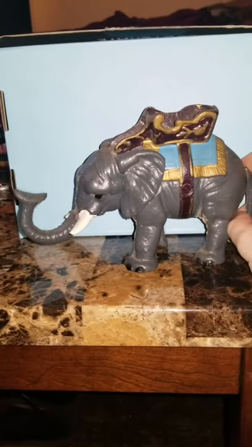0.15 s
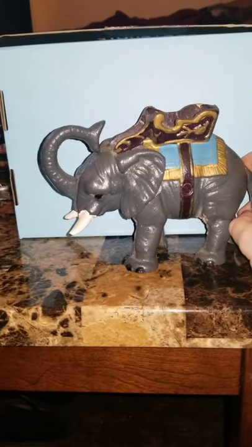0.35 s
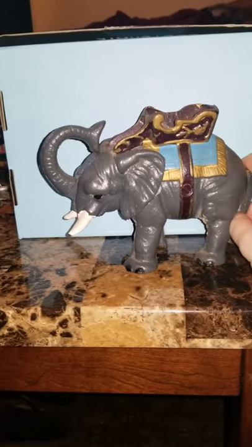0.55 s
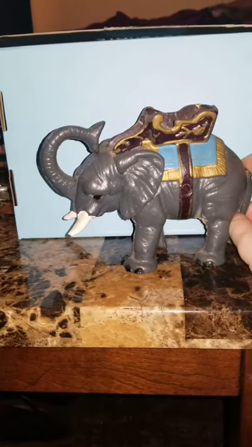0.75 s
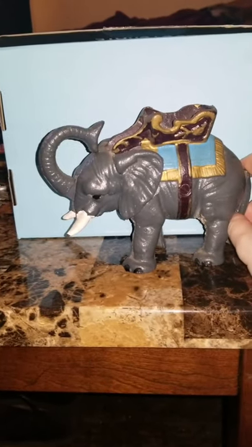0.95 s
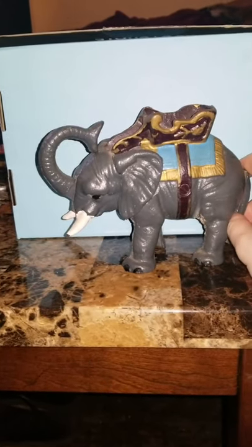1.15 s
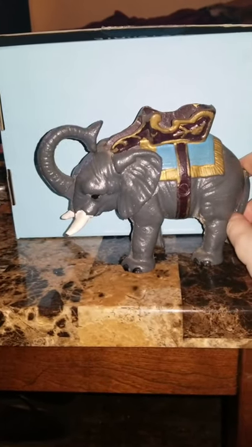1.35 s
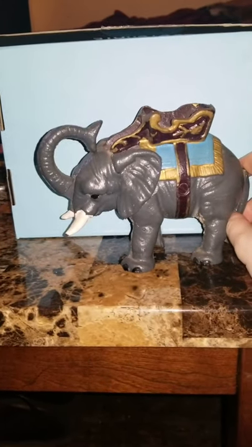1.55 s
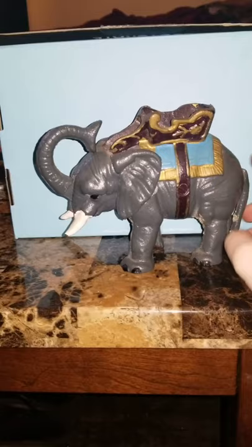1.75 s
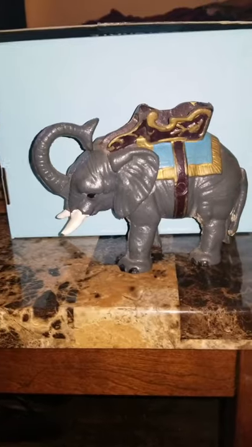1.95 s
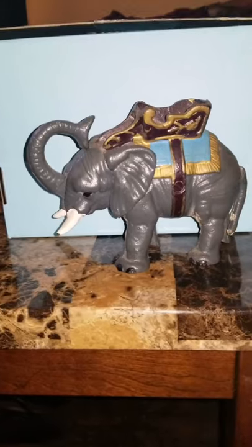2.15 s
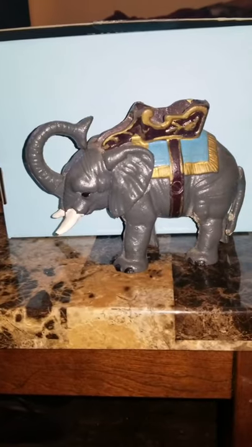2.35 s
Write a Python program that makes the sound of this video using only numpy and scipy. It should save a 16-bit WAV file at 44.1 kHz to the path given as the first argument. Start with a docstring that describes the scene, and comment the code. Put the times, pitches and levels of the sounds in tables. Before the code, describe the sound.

Close up on a table, a sprung iron trunk scrapes and slams against its stop, rattling briefly; a loose metal part slides and clinks, then only faint fan noise and low microphone bumps on the left.

```python
"""Cast-iron elephant bank on a table: the sprung trunk scrapes round its pivot, clacks against the head
and chatters. Scrape: random grains convolved with a shell response; clack: noise rings and sine modes.
A short squeak comes just before the swing; catch ticks go with it; a loose part then slides and clinks.
A fan runs as coloured noise; later handling bumps (sine bursts) and rumble reach the left microphone.
The recorder's gain control ducks on loud peaks, holds and recovers."""
import sys
import numpy as np
from scipy import signal
from scipy.fft import rfft, irfft
from scipy.io import wavfile
from scipy.ndimage import uniform_filter1d, minimum_filter1d

SR = 44100
rng = np.random.default_rng(int(sys.argv[2]) if len(sys.argv) > 2 else 0)


def dump(signal):
    """Clip the signal to [-1, 1] and save it as 16-bit WAV at the path in sys.argv[1]."""
    limited = np.clip(np.atleast_2d(signal).T, -1, 1)
    pcm = np.round(limited * 32767).astype(np.int16)
    wavfile.write(sys.argv[1], SR, pcm)


N = 105840

# fan and microphone hiss: (frequency [Hz], relative density [dB per Hz])
FAN_COLOUR = [(25, -4.5), (50, 0.5), (130, -2), (190, -9), (340, -4.5), (410, -10), (480, -2.5),
              (580, -7.5), (820, -8), (1180, -5), (1700, -11.5), (2080, -10.5), (2600, -17), (3800, -23),
              (7400, -24), (8000, -35), (15500, -37)]
FAN_DB, FAN_LEFT_DB, FAN_ALIKE_HZ = -55, 1.5, 1347
FAN_RIPPLE_DB, FAN_RIPPLE_HZ = 2.04, 30.42

# handling bumps: (time [s], level [dB], pitch [Hz], Gaussian length [s])
HANDLING_BUMPS = [(1.687, -34.5, 118.5, 0.0032), (1.698, -32, 74, 0.0055), (1.7129, -25.5, 147.5, 0.002),
                  (1.721, -33.5, 112, 0.0088), (1.738, -24.5, 120, 0.0025), (1.748, -30, 57, .007),
                  (1.815, -45, 86.5, 0.013), (2.092, -35, 78, 0.0048), (2.177, -39.5, 122, 0.019),
                  (2.196, -37.5, 135, 0.0037)]
# handling rumble: (time [s], level [dB])
RUMBLE_LEVEL = [(1.6, -84), (1.72, -43), (1.86, -59), (2.04, -55), (2.18, -42.5), (2.3, -63.5), (2.4, -77)]
# rumble colour: (frequency [Hz], relative density [dB per Hz])
RUMBLE_SPECTRUM = [(20, -4), (60, 2.5), (140, -6), (300, -22.5), (1500, -54)]

# clinks of the loose part: (time [s], level [dB], knock on the body [dB])
PART_CLINKS = [(0.512, -46.5, 8.5), (0.5657, -35, -23), (0.578, -35, -9), (0.5841, -27.5, -15),
               (0.587, -24.5, 2)]
# slide of the loose part: (time [s], level [dB])
PART_SLIDE = [(.495, -59), (.528, -48), (.56, -54), (0.584, -43)]
# ringing modes of the loose part: (frequency [Hz], level [dB])
PART_MODES = [(3050, -6), (3810, -23.5), (5410, -17), (5590, -11), (6910, -6.5), (7440, -12), (10600, -11)]
# bright tick of the loose part: (frequency [Hz], relative density [dB per Hz])
PART_TICK_COLOUR = [(600, -22.5), (1050, 5.5), (1500, -8), (2500, -9.5), (3100, -0.5), (4300, -14.5),
                    (5400, 1.5), (6200, -19), (7500, 4), (8900, -15.5), (11200, -11), (15500, -16)]
PART_T60_S, PART_CRACK_T60_S, PART_CONTACT_S, PART_RING_DB = 0.13, 0.025, 0.0005, -6.5
SLIDE_ROUGH_DB, SLIDE_ROUGH_HZ = 2, 118

# short knock of the hollow body: (frequency [Hz], level [dB])
KNOCK_MODES = [(950, -10), (1100, -4), (2030, -12)]
KNOCK_T60_S, KNOCK_LAG_S = 0.032, 0.0001  # clinks use half the lag

# recoils of the casting under the trunk: (time [s], level [dB])
RECOIL_HITS = [(0.3182, -24.5), (0.325, -18.5)]
# low modes of the recoiling casting: (frequency [Hz], level [dB])
CASTING_MODES = [(500, -16), (745, -10.5), (895, -0.5), (1025, -3.5)]
RECOIL_T60_S, RECOIL_LAG_S = 0.051, 0.00008

# ticks of catch and spring: (time [s], level [dB], treble shelf [dB])
CATCH_TICKS = [(0.2007, -31.5, -14.5), (0.2613, -34, -3.5), (0.2657, -43, 3), (0.2727, -32.5, 5.5),
               (0.291, -39, -2.5), (0.3089, -33, 3.5)]
TICK_T60_S, TICK_KNOCK_DB = 0.033, -5
SQUEAK_S, SQUEAK_SIGMA_S, SQUEAK_HZ, SQUEAK_DB = 0.19, 0.0065, 3990, -38

# trunk's swing: (time [s], rubbing level [dB], treble shelf [dB])
TRUNK_SWING = [(.203, -41.5, -9.5), (0.211, -32.5, -10.5), (0.233, -30, -14.5), (0.254, -32.5, -4.5),
               (.27, -29, -0.5), (0.294, -28, -10.5), (0.313, -29, 1)]
SWING_KNOCK_DB = -5.5  # hollow-body knock relative to the shell
GRAINS_PER_S, GRAIN_SPREAD_DB = 450, 3.5

# blows on the iron body: (time [s], level [dB], treble shelf [dB], table thud re blow [dB])
TRUNK_BLOWS = [(0.3141, -30.5, 13, -24), (0.3171, -22.5, 12, -7.5), (0.3195, -19, 4, -9.5),
               (0.3256, -21, 4, -15.5), (0.334, -28, 10.5, -11), (0.3421, -29.5, 4.5, -11.5),
               (0.369, -32.5, 0.5, -7.5), (0.4077, -33.5, 2, -3)]
# clear modes of the iron body: (frequency [Hz], level [dB])
IRON_MODES = [(905, -17.5), (1022, -19), (1094, -18), (2013, -23.5), (2865, -18.5), (3400, -24.5),
              (3592, -14.5), (3982, -14), (5460, -15.5), (6255, -18), (6800, -28.5), (7306, -12.5)]
# dense modes between them: (frequency [Hz], relative density [dB per Hz])
IRON_COLOUR = [(150, -16.5), (600, -13), (900, 5.5), (1150, 4), (1600, -6.5), (2100, 1.5), (2550, -15),
               (2900, -1), (4400, -3), (4750, -7), (5500, -4.5), (7450, -3.5), (8100, -13.5),
               (10500, -13.5), (11400, -10.5), (15500, -14.5)]
BODY_T60_S, BODY_CRACK_T60_S, BODY_RING_DB, MODE_T60_S = 0.11, 0.022, -2.5, 0.18
SHELL_RIPPLE_DB, SHELL_RIPPLE_HZ = 2.4, 70
RING_CONTRAST = 1.06  # exponent: above 1 it deepens the peaks and dips of the dense ring's colour
SPOT_SHARE = 0.72  # energy share of the ring redrawn at each contact spot
CONTACT_S = 0.00095
# table top: (frequency [Hz], relative density [dB per Hz])
TABLE_COLOUR = [(40, -18.5), (85, -14), (135, 0), (210, -5.5), (275, 0), (360, -11), (520, -11),
                (900, -13.5), (4000, -69)]
TABLE_T60_S, TABLE_RISE_S = 0.2, 0.0022

TREBLE_HZ = 2734  # shelf midpoint; shell ripple is full above it
ROOM_T60_S, ROOM_RISE_S = 0.22, 0.0043
LEFT_DB, LEFT_LEAD_S = 4.5, 0.00012  # toy nearer the left; knocks and modes pan by half, room by a quarter
ALIKE_HZ = 1110  # stereo correlation 0.5 here; half this for room and thud
AGC_OVER_DB, AGC_DEPTH_DB, AGC_HOLD_S, AGC_RELEASE_DB_S = -19, 5, 0.95, 12.5
CEILING, TOP_HZ = 0.56, 15550


def undb(db):
    """Decibels to amplitude gain."""
    return 10 ** (np.asarray(db) / 20)


def clock():
    """Time of every sample [s]."""
    return np.arange(N) / SR


def unit(x):
    """Scale to rms 1."""
    return x / np.sqrt(np.mean(x ** 2))


def freqs():
    """Frequency of every spectral line [Hz], at least 1."""
    return np.maximum(np.arange(N // 2 + 1) * SR / N, 1)


def colour(points):
    """Spectral gain, interpolated in dB over log frequency."""
    hz, db = np.array(points, float).T
    return undb(np.interp(np.log(freqs()), np.log(hz), db))


def uneven(db, hz):
    """Random peaks and dips of close resonances, about hz apart."""
    return undb(db * np.interp(freqs() / hz, np.arange(N), rng.standard_normal(N)))


def wander(hz):
    """Random motion of spread 1, low-passed near hz."""
    return unit(irfft(rfft(rng.standard_normal(N)) / (1 + (freqs() / hz) ** 2), N))


def pan(db):
    """Left and right gains, db apart."""
    return undb(np.array([[db], [-db]]) / 2)


def noise(gain, alike_hz):
    """Coloured stereo noise, rms 1; the channels grow alike below alike_hz."""
    mid, side = rfft(rng.standard_normal((2, N)))
    alike = 1 / (1 + (freqs() / alike_hz) ** 2)
    common = mid * np.sqrt(1 + alike)
    opposed = side * np.sqrt(1 - alike) * np.array([[1], [-1]])
    return unit(irfft(gain * (common + opposed), N))


def fade(t60_s):
    """Exponential decay, 60 dB in t60_s."""
    return np.exp(-np.log(1000) * clock() / t60_s)


def rise(s):
    """Soft attack with time constant s."""
    return 1 - np.exp(-clock() / s)


def late(x, s):
    """Delay a stereo sound by s seconds."""
    return np.pad(x, ((0, 0), (int(s * SR), 0)))[:, :N]


def brighten(x, db):
    """Treble shelf: half of db at TREBLE_HZ."""
    over = (freqs() / TREBLE_HZ) ** 2
    return irfft(rfft(x) * undb(db * over / (1 + over)), N)


def strike(gain, envelope, room_db):
    """Dense noise ring from the toy plus a slower, more diffuse room answer."""
    direct = noise(gain, ALIKE_HZ) * envelope * pan(LEFT_DB)
    room = undb(room_db) * fade(ROOM_T60_S) * rise(ROOM_RISE_S)
    return direct + noise(gain, ALIKE_HZ / 2) * room * pan(LEFT_DB / 4)


def mode(hz, t60_s):
    """One decaying sine; phase differs more between the microphones at higher hz."""
    t = clock()[:int(2 * t60_s * SR)]
    phase = rng.uniform(0, 2 * np.pi) + rng.standard_normal((2, 1)) * hz / ALIKE_HZ / 2
    decay = np.exp(-np.log(1000) * t / t60_s)
    ring = decay * np.sin(2 * np.pi * hz * t + phase) * pan(LEFT_DB / 2)
    return np.pad(ring, ((0, 0), (0, N - len(t))))


def knock(modes, t60_s, lag_s):
    """Low modes set off together, their phase lagging on the right."""
    t = clock() - np.array([[0], [lag_s]])
    tones = sum(undb(db) * np.sin(2 * np.pi * hz * t) for hz, db in modes)
    return tones * fade(t60_s) * pan(LEFT_DB / 2)


def body(iron):
    """One contact on the iron shell: crack, dense ring and clear modes."""
    crack = noise(iron, ALIKE_HZ) * fade(BODY_CRACK_T60_S) * pan(LEFT_DB)
    ring = strike(iron ** RING_CONTRAST, undb(BODY_RING_DB) * fade(BODY_T60_S), room_db=-6)
    clear = sum(undb(db) * mode(hz, MODE_T60_S) for hz, db in IRON_MODES)
    return np.sqrt(2) * crack + ring + clear


def fan():
    """Steady air noise, coloured by the room's resonances."""
    air = noise(colour(FAN_COLOUR) * uneven(FAN_RIPPLE_DB, FAN_RIPPLE_HZ), FAN_ALIKE_HZ)
    return air * undb(FAN_DB) * pan(FAN_LEFT_DB)


def handling():
    """Gaussian-windowed sine bumps and low noise rumble on the left microphone alone."""
    t = clock()
    bumps = 0
    for s, db, hz, length_s in HANDLING_BUMPS:
        swell = np.exp(-.5 * ((t - s) / length_s) ** 2)
        bumps = bumps + undb(db) * swell * np.sin(2 * np.pi * hz * (s - t))
    s, db = np.array(RUMBLE_LEVEL).T
    rumble = noise(colour(RUMBLE_SPECTRUM), ALIKE_HZ)[0] * undb(np.interp(t, s, db))
    return np.array([bumps + rumble, np.zeros(N)])


def slide(gain):
    """The loose part rubs: coloured noise with a rough level."""
    t = clock()
    s, db = np.array(PART_SLIDE).T
    level_db = np.interp(t, s, db) + SLIDE_ROUGH_DB * wander(SLIDE_ROUGH_HZ)
    return noise(gain, ALIKE_HZ) * undb(level_db) * (t > s[0]) * (t < s[-1]) * pan(LEFT_DB)


def clinks():
    """The loose part slides, skips and lands ringing, knocking the hollow body."""
    gain = colour(PART_TICK_COLOUR) * uneven(SHELL_RIPPLE_DB, SHELL_RIPPLE_HZ)
    out = slide(gain)
    for s, db, knock_db in PART_CLINKS:
        tick = strike(gain, fade(PART_CRACK_T60_S), room_db=-14.5)
        ring = undb(PART_RING_DB) * sum(undb(mode_db) * mode(hz, PART_T60_S) for hz, mode_db in PART_MODES)
        hollow = undb(knock_db) * knock(KNOCK_MODES, KNOCK_T60_S, KNOCK_LAG_S / 2)
        out = out + undb(db) * late((tick + ring + hollow) * rise(PART_CONTACT_S), s)
    return out


def recoil():
    """The hollow casting answers the trunk's weight with low modes."""
    hit = knock(CASTING_MODES, RECOIL_T60_S, RECOIL_LAG_S)
    return sum(undb(db) * late(hit, s) for s, db in RECOIL_HITS)


def squeak():
    """Short pivot squeak: a sine of unsteady pitch under a Gaussian swell."""
    swell = np.exp(-.5 * ((clock() - SQUEAK_S) / SQUEAK_SIGMA_S) ** 2)
    hz = SQUEAK_HZ * (1 + 0.018 * wander(hz=150))
    phase = 2 * np.pi * np.cumsum(hz) / SR
    return undb(SQUEAK_DB) * swell * np.sin(phase) * pan(LEFT_DB)


def ticks(iron):
    """Catch and spring tick: short, dry contacts that knock the shell."""
    out = 0
    for s, db, treble_db in CATCH_TICKS:
        snap = brighten(strike(iron, fade(TICK_T60_S), room_db=-10), treble_db)
        hollow = undb(TICK_KNOCK_DB) * knock(KNOCK_MODES, KNOCK_T60_S, KNOCK_LAG_S)
        out = out + undb(db) * late(snap + hollow, s)
    return out


def slips():
    """Rasping run of tiny contacts, uneven in spacing, sign and force."""
    gaps = rng.gamma(2, 1 / 2, GRAINS_PER_S)  # mean 1, so the run lasts about 1 s
    at = (np.cumsum(gaps) * SR / GRAINS_PER_S).astype(int)
    size = rng.choice([-1, 1], len(at)) * undb(GRAIN_SPREAD_DB * rng.standard_normal(len(at)))
    return np.bincount(at, size, N)[:N] * np.sqrt(SR / np.sum(size ** 2))


def swing(iron):
    """The pivot sticks and slips: dense tiny contacts ring the body, treble varying through the swing."""
    s, db, treble_db = np.array(TRUNK_SWING).T
    t = clock()
    force = slips() * undb(np.interp(t, s, db)) * (t > s[0]) * (t < s[-1])
    hollow = unit(knock(KNOCK_MODES, KNOCK_T60_S, KNOCK_LAG_S))
    shell = (unit(body(iron)) + undb(SWING_KNOCK_DB) * hollow) / np.sqrt(N)
    out = 0
    # crossfade from one treble setting to the next
    for share, bright_db in zip(np.eye(len(s)), treble_db):
        part = [force * np.interp(t, s, share)]
        out = out + brighten(signal.fftconvolve(part, shell, axes=1)[:, :N], bright_db)
    return out


def clack(iron):
    """The trunk hits its stop and chatters, ringing the shell; the feet thump the table."""
    out, shell = 0, body(iron)
    for s, db, treble_db, thud_db in TRUNK_BLOWS:
        spot = np.sqrt(1 - SPOT_SHARE) * shell + np.sqrt(SPOT_SHARE) * body(iron)
        ring = brighten(late(spot * rise(CONTACT_S), s), treble_db)
        thud = noise(colour(TABLE_COLOUR), ALIKE_HZ / 2) * fade(TABLE_T60_S) * rise(TABLE_RISE_S)
        out = out + undb(db) * (ring + undb(thud_db) * late(thud, s))
    return out


def scene():
    """The toy, heard first on the left, over fan and handling."""
    ripple_db = SHELL_RIPPLE_DB * np.minimum(freqs() / TREBLE_HZ, 1)
    iron = colour(IRON_COLOUR) * uneven(ripple_db, SHELL_RIPPLE_HZ)
    toy = clinks() + recoil() + squeak() + ticks(iron) + swing(iron) + clack(iron)
    return fan() + handling() + np.array([toy[0], late(toy, LEFT_LEAD_S)[1]])


def record(dry):
    """Gain control ducks on loud peaks, holds and creeps back; peaks are rounded, the top is cut."""
    peak_db = 20 * np.log10(np.abs(dry).max(axis=0) + 1e-9)
    duck_db = -np.clip(peak_db - AGC_OVER_DB, 0, AGC_DEPTH_DB)
    half = int(AGC_HOLD_S * SR / 2)
    # origin shifts the window into the past
    held_db = minimum_filter1d(duck_db, 2 * half + 1, origin=half, mode="constant")
    creep_db = AGC_RELEASE_DB_S * clock()
    gain_db = uniform_filter1d(np.minimum.accumulate(held_db - creep_db) + creep_db, size=128)
    rounded = CEILING * np.tanh(dry * undb(gain_db) / CEILING)
    low_pass = signal.ellip(8, .2, 70, TOP_HZ, fs=SR, output="sos")
    return signal.sosfilt(low_pass, rounded)


dry = scene()
out = record(dry)
dump(out)
```